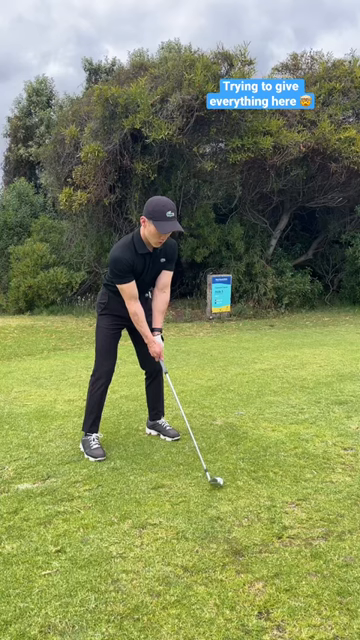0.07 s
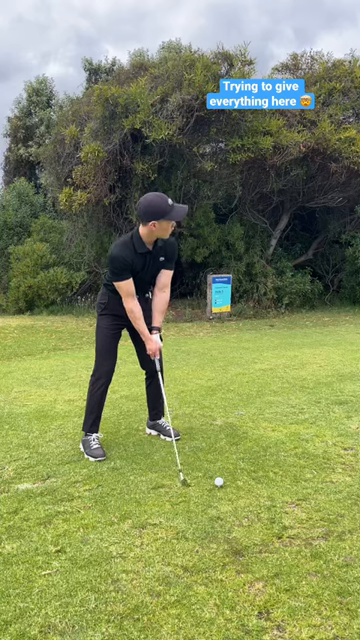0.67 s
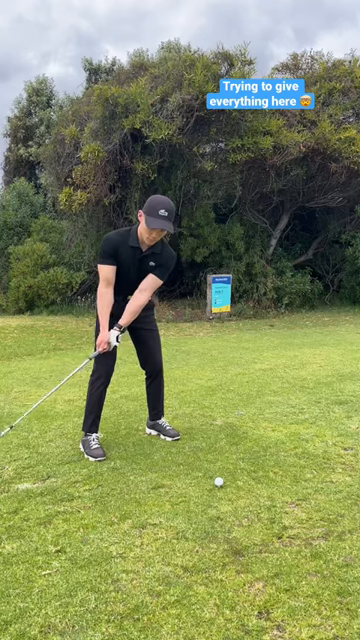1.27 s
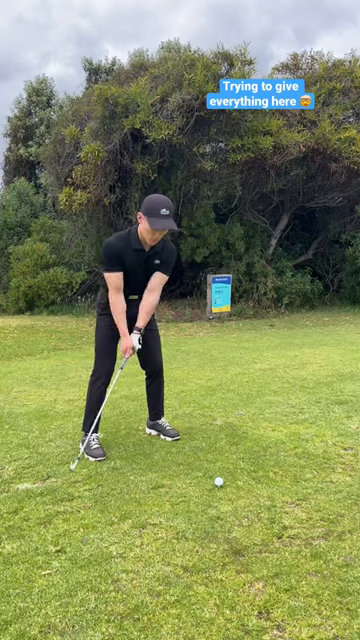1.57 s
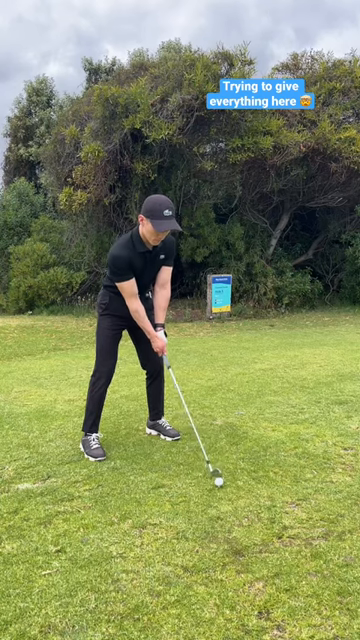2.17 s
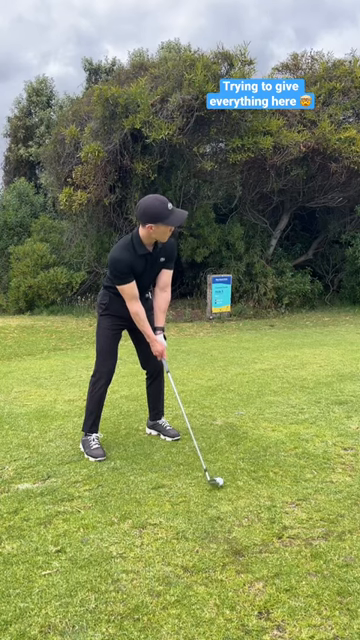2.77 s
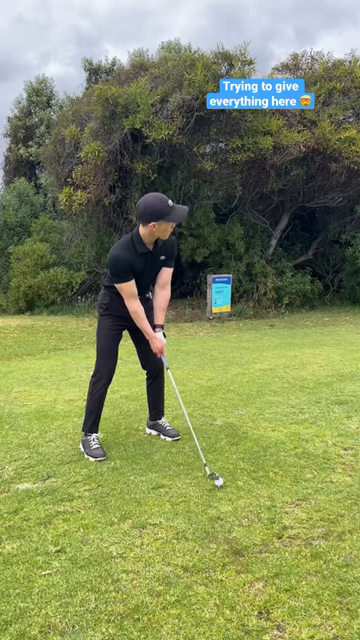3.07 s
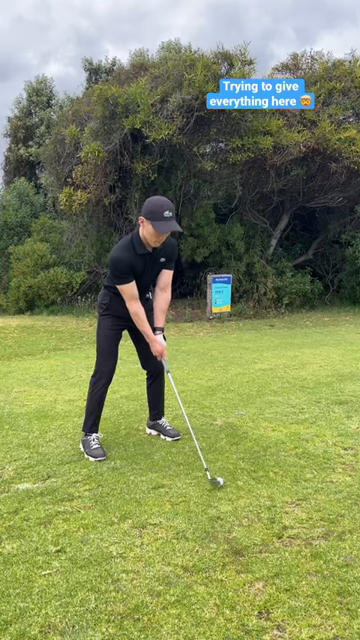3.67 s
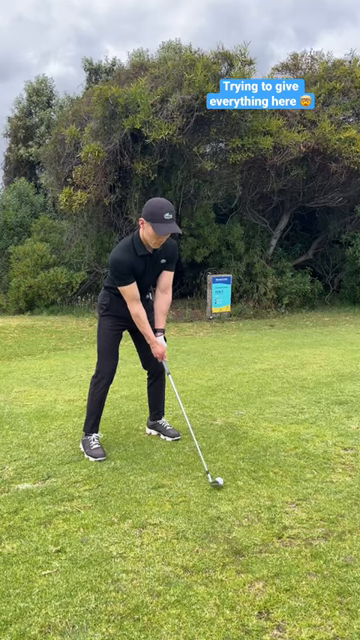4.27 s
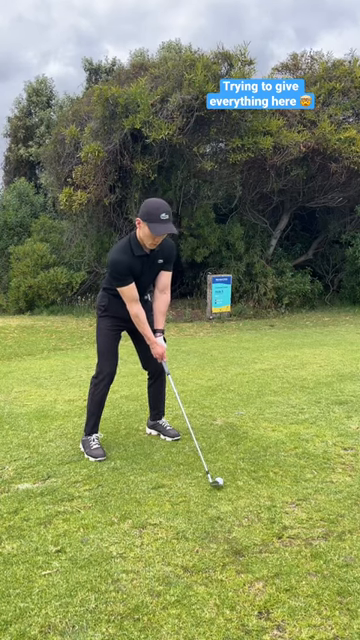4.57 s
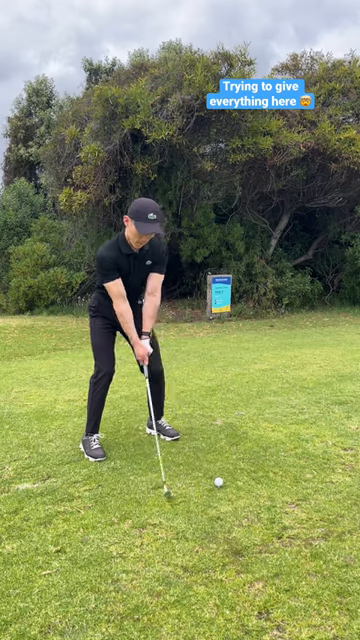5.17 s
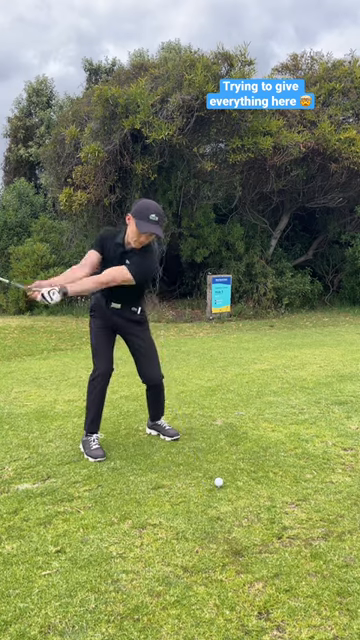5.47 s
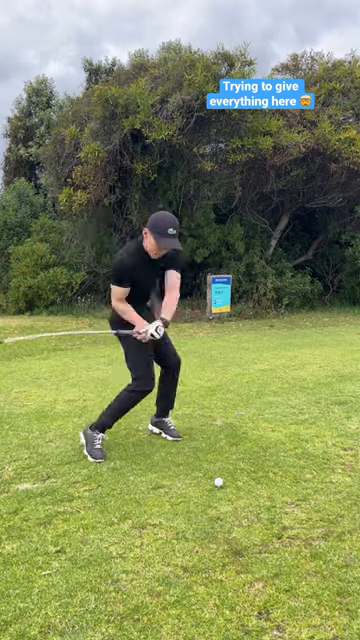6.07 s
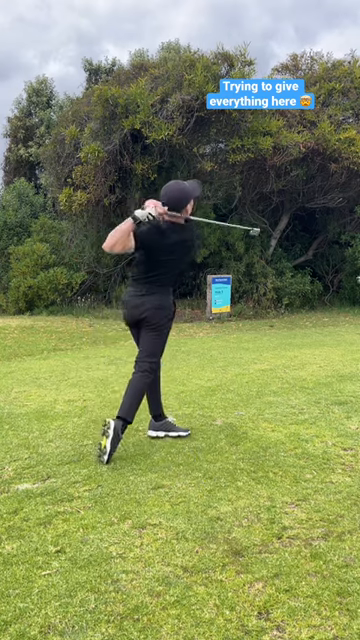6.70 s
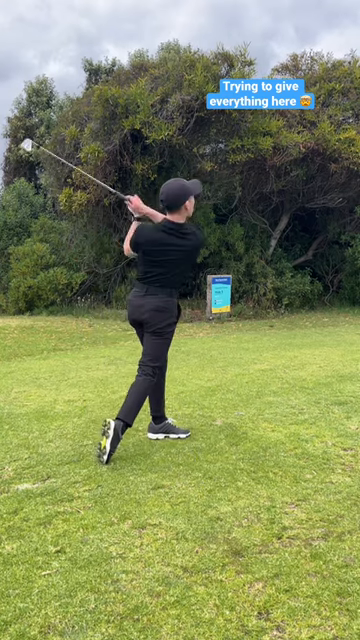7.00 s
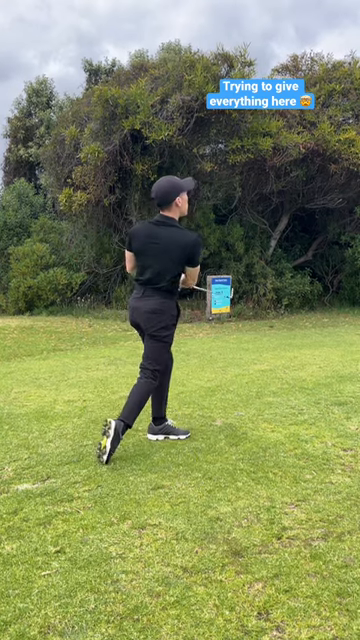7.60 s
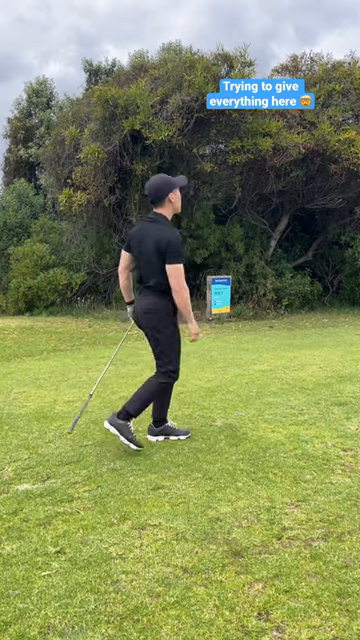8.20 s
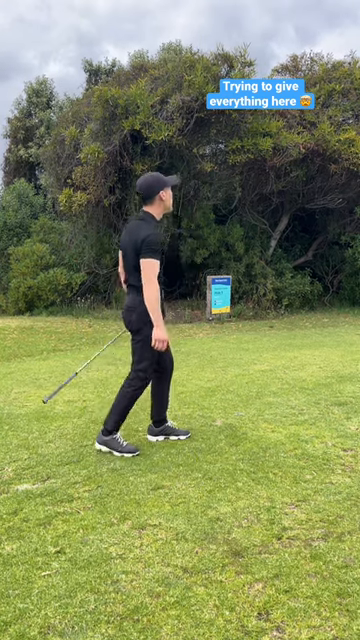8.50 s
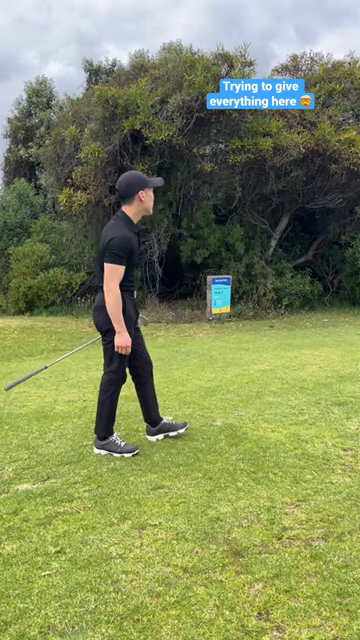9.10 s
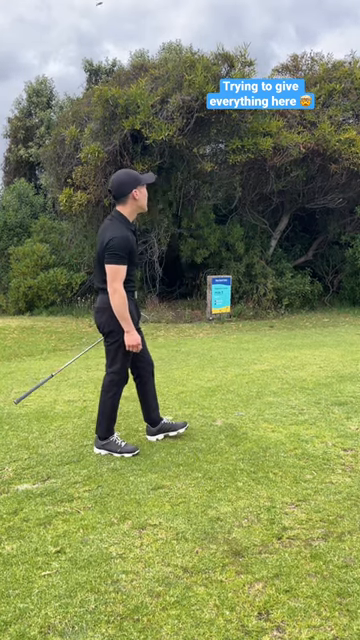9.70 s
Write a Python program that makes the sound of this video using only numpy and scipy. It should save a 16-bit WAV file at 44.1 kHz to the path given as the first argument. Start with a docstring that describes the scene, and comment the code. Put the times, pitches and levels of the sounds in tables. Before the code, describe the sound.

Wind buffets the microphone and small birds chirp as a golf club swishes and strikes a ball with a sharp crack.

```python
"""Gusts buffet the microphone over a distant rush; small birds call from the scrub and a far tone fades.
After 5 s a golfer lifts an iron with a swish of sleeves, then swings so fast that the shaft whistles.
At 6.1 s the club face cracks against the ball, both ring briefly, and turf thuds and sprays.
A songbird sings and a run of pips swells as the golfer steps off over the grass, around 8 s.
Near the end one bird scolds harshly while the wind blows on."""
import sys
import numpy as np
from scipy import signal
from scipy.fft import rfft, irfft, next_fast_len
from scipy.io import wavfile
from scipy.ndimage import map_coordinates

SR = 44100
rng = np.random.default_rng(int(sys.argv[2]) if len(sys.argv) > 2 else 0)


def generate_wav(signal):
    """Clip the signal to [-1, 1] and save it as 16-bit WAV at the path in sys.argv[1]."""
    frames = np.transpose(np.atleast_2d(signal))
    scaled = np.clip(frames, -1, 1) * 32767
    pcm = np.round(scaled).astype(np.int16)
    wavfile.write(sys.argv[1], SR, pcm)


N = 434385


def amp(db):
    """Turn decibels into a gain."""
    return 10 ** (np.asarray(db) / 20)


def unit(x):
    """Scale a sound to an average (rms) size of 1."""
    return x / np.sqrt(np.mean(x ** 2) + 1e-20)


def along(points, hz):
    """Read between (frequency, value) points on a log frequency scale."""
    freqs, values = np.transpose(points)
    return np.interp(np.log(hz + 1), np.log(freqs + 1), values)


def curve(rows):
    """Join (time, value) points with straight lines, one value per sample."""
    return np.interp(np.arange(N) / SR, *np.transpose(rows))


def wobble(rate):
    """A smooth random curve through `rate` points a second."""
    return map_coordinates(rng.standard_normal(int(N * rate / SR) + 4), [np.arange(N) * rate / SR])


def bell(s, length):
    """A smooth hump around time s, half as high at the ends of its length."""
    return .5 ** np.minimum((2 * (np.arange(N) / SR - s) / length) ** 2, 20)


def swells(rows):
    """Gain of events that rise until their time, hold, then fall; rise and fall each span 20 dB."""
    t, power = np.arange(N) / SR, 0
    for s, rise, hold, fall, db in rows:
        below = np.maximum(s - t, 0) / rise + np.maximum(t - s - hold, 0) / fall
        power += amp(db - 20 * np.minimum(below, 10)) ** 2
    return np.sqrt(power)


def filtered(x, response):
    """Multiply each frequency in x by response(frequency)."""
    n = x.shape[-1]
    padded = next_fast_len(n + 8192)
    return irfft(rfft(x, padded) * response(np.fft.rfftfreq(padded, 1 / SR)), padded)[..., :n]


def pan(db):
    """Left and right gains, with the left louder by db."""
    return amp([[db / 2], [-db / 2]])


def noise(colour, alike):
    """Stereo noise of a given colour; alike=1 makes both sides the same, 0 unrelated."""
    shared, apart = filtered(rng.standard_normal((2, N)), lambda hz: amp(along(colour, hz)))
    turn = np.arccos(np.clip(alike, -1, 1)) / 2
    shared, apart = np.cos(turn) * shared, np.sin(turn) * apart
    return unit(np.array([shared + apart, shared - apart]))


def add(track, s, sound):
    """Mix a sound into a stereo track at time s."""
    part = track[:, max(round(s * SR), 0):][:, :sound.shape[-1]]
    part += sound[..., :part.shape[-1]]


# how loud the far rush and the treble hiss are: (time [s], level [dB])
DISTANT_LEVEL = [(0.0, -60.5), (2.2, -57.5), (5.5, -56.5), (5.95, -54), (6.55, -59), (7.05, -52.5),
                 (7.42, -58.5), (8.5, -54.5), (9.3, -55.5), (9.85, -54)]
TREBLE_LEVEL = [(0.0, -68), (1.1, -69), (1.35, -66), (1.85, -66), (2.25, -71), (4.1, -70), (5.7, -67.5),
                (6.6, -62), (7.2, -79.5), (8.6, -69.5), (9.0, -77), (9.85, -87)]
# their colours, or how strong each frequency is: (frequency [Hz], level [dB])
DISTANT_COLOUR = [(30, -8), (200, -5.5), (450, -10), (750, 2.5), (1000, -1.5), (1400, -7.5), (2000, -15.5),
                  (2800, -30), (6000, -47.5), (12000, -74.5)]
TREBLE_COLOUR = [(1200, 12.5), (2400, 1), (3300, 4.5), (4600, 4.5), (5500, -7), (6800, -21.5),
                 (8000, -16.5), (12000, -31.5), (16000, -34.5)]
def air():
    """A distant steady rush, and a treble hiss that swells around the songbird's phrases."""
    far = amp(curve(DISTANT_LEVEL) + 1 + 1.2 * wobble(4.4)) * noise(DISTANT_COLOUR, alike=0.055)
    hiss = amp(curve(TREBLE_LEVEL) + 3 + 1.1 * wobble(29)) * noise(TREBLE_COLOUR, alike=0.48)
    return far + hiss * pan(0.66)


# swells of the far tone: (time [s], rise [s], hold [s], fall [s], level [dB])
FAR_TONE = [(.05, 0.027, 0.13, 0.18, -72.5), (.56, 0.06, 0.21, .2, -66.5), (1.3, 0.37, .15, 0.18, -72.5)]
def far_tone(hz=1160):
    """A soft tone far away on the right, wavering a little."""
    phase = 2 * np.pi * hz * np.arange(N) / SR + .5 * wobble(25)
    return swells(FAR_TONE) * unit(np.sin(phase) * amp(1.7 * wobble(20))) * pan(-15)


# strength of the breeze and of its finest swirls between gusts: (time [s], level [dB])
BREEZE = [(0.0, -43.5), (0.8, -46.5), (1.5, -44), (1.9, -43.5), (2.23, -48), (2.4, -43.5), (3.55, -47),
          (4.25, -41.5), (4.5, -52), (4.9, -42.5), (5.6, -42.5), (6.05, -40), (6.95, -39), (7.3, -41),
          (7.7, -37), (8.4, -40.5), (9.4, -42), (9.85, -40.5)]
FINE_LEVEL = [(0.0, -69.5), (2.2, -65.5), (2.55, -63.5), (3.2, -68), (4.7, -66), (4.95, -66), (5.12, -55),
              (5.35, -70), (5.8, -54), (6.3, -57), (6.6, -59), (7.05, -48), (7.3, -51.5), (7.55, -43.5),
              (7.8, -42.5), (8.0, -45), (8.3, -47.5), (8.55, -52), (8.75, -46.5), (9.1, -54), (9.85, -54.5)]
# gusts on top of the breeze: (time [s], length [s], rumble level [dB], swirls over rumble [dB])
GUSTS = [(0.205, 0.03, -28.5, -7.5), (0.26, 0.05, -34, -8.5), (0.34, .06, -39, -11.5),
         (0.614, 0.036, -37, -12.5), (1.022, 0.27, -45.5, -19), (1.424, 0.023, -34, -10.5),
         (1.605, 0.11, -39, -30), (1.743, 0.079, -39.5, -5), (2.48, 0.15, -52.5, 6.5),
         (2.8, 0.039, -38.5, -8.5), (3.765, 0.06, -28, -11), (3.835, .035, -30.5, -10.5),
         (4.036, 0.014, -40, 6), (4.09, .025, -32.5, -4.5), (4.15, 0.05, -32, -3.5),
         (4.308, 0.076, -37, -16.5), (5.17, 0.05, -37.5, 1), (5.46, .04, -42, 0), (5.78, 0.05, -40.5, 0.5),
         (6.063, .014, -40.5, 5.5), (6.35, 0.069, -34, -26), (6.53, .2, -47.5, -4), (6.85, 0.11, -34.5, -7),
         (7.042, 0.07, -44, 7.5), (7.583, 0.17, -33.5, 1.5), (7.747, 0.084, -32.5, 1.5),
         (7.888, 0.035, -42, 2), (8.078, 0.025, -32, -3.5), (8.245, 0.047, -33, -2.5),
         (8.433, 0.034, -38, 0.5), (8.804, 0.055, -47.5, 6), (8.97, 0.043, -37, -6),
         (9.704, 0.054, -39, 3.5)]
def wind_gains(usual_breeze_db=-41.5, fine_gust_db=-17.5):
    """Breeze and gusts add their power to a low rumble, swirls of air and finer swirls."""
    breeze_db = curve(BREEZE) + wobble(11)
    rumble_power = amp(breeze_db) ** 2
    swirl_power = amp(breeze_db - 4.5 + 0.9 * (breeze_db - usual_breeze_db)) ** 2
    fine_power = amp(curve(FINE_LEVEL)) ** 2
    for s, length, db, swirl_db in GUSTS:
        gust = amp(db) ** 2 * bell(s, length)
        rumble_power += gust
        swirl_power += amp(swirl_db) ** 2 * gust
        fine_power += amp(swirl_db + fine_gust_db) ** 2 * gust
    return np.sqrt([rumble_power, swirl_power, fine_power])


# the wind's three layers, low to high: (frequency [Hz], level [dB])
RUMBLE_COLOUR = [(20, -36.5), (35, -6.5), (58, 5), (100, 1), (160, -6.5), (260, -16.5), (500, -64),
                 (2000, -120)]
SWIRL_COLOUR = [(60, -30), (130, -1.5), (200, 1.5), (300, -1), (450, -13.5), (700, -24), (1300, -35.5),
                (3000, -56), (7000, -110)]
FINE_COLOUR = [(200, -16.5), (400, 8), (550, 4), (750, -4.5), (1100, -15), (2000, -26.5), (5000, -68.5),
               (9000, -110)]
def wind():
    """Wind buffets the microphone; stronger wind sheds smaller swirls, which sound higher."""
    rumble_gain, swirl_gain, fine_gain = wind_gains()
    lumps = wobble(30)
    rumble = rumble_gain * amp(1.6 * lumps - 0.27) * noise(RUMBLE_COLOUR, alike=0.9) * pan(1.5)
    swirls = swirl_gain * amp(1.9 * lumps - 3) * noise(SWIRL_COLOUR, alike=0.45) * pan(1)
    fine = fine_gain * amp(1.6 * lumps) * noise(FINE_COLOUR, alike=0.1) * pan(0.93)
    return rumble + swirls + fine


# single thumps of air: (time [s], level [dB], rough pitch [Hz])
THUMPS = [(0.185, -26.5, 110), (0.265, -23, 156), (5.108, -24.5, 95), (6.0384, -21, 162), (6.124, -28, 172)]
def wind_thumps():
    """Each thump is one push and one pull of air on the microphone."""
    out = np.zeros((2, N))
    for s, db, hz in THUMPS:
        u = np.linspace(-np.pi, np.pi, round(2 * SR / hz))
        push_pull = -2 * u * np.exp(-u * u)
        add(out, s - 1 / (2 * hz), push_pull * amp(db) * pan(2.5))
    return out


# how long the bushes echo: (frequency [Hz], time to fade by 60 dB [s])
SCRUB_FADE = [(200, .25), (2000, 0.41), (4500, 0.15), (7000, 0.18), (14000, 0.088)]
def scrub_echo(x):
    """Bushes scatter a sound into a thin, blurred tail."""
    hz, t, spectrum = signal.stft(rng.standard_normal((2, SR // 2)), SR, nperseg=256)
    fade = amp(-60 * t / along(SCRUB_FADE, hz)[:, None])
    tail = signal.istft(spectrum * fade, SR, nperseg=256)[1]
    return signal.fftconvolve(x, tail / np.linalg.norm(tail[0]), axes=1)[:, :N]


def among_leaves(sound, echo_db, fade_s=0.2):
    """A note plus quickly dying echoes from the leaves right around the bird."""
    t = np.arange(SR // 6) / SR
    echoes = rng.standard_normal((2, len(t))) * amp(-60 * t / fade_s) * (1 - np.exp(-t / 0.0031))
    response = (t == 0) + amp(echo_db) * echoes / np.linalg.norm(echoes[0])
    return signal.fftconvolve(sound, response, axes=1)


def glide(length, start, middle, end, waver):
    """Pitch and loudness of one bird note: a slightly unsteady arc that swells and fades."""
    progress = np.linspace(0, 1, max(round(length * SR), 16))
    hz = np.polyval(np.polyfit([0, .5, 1], [start, middle, end], 2), progress)
    points = rng.standard_normal(256)
    shake = map_coordinates(points, [progress * length * 160], mode="mirror")
    drift_db = map_coordinates(points[::-1], [progress * length * 40], mode="mirror")
    return hz * (1 + waver * shake), np.abs(np.sin(np.pi * progress)) ** 0.62 * amp(drift_db)


def flutter(samples, rate):
    """A random tremble for one note, through `rate` points a second."""
    return map_coordinates(rng.standard_normal(256), [np.arange(samples) * rate / SR], mode="mirror")


def whistle(length, start, middle, end, waver, ragged=1):
    """A bird's single gliding tone; `ragged` sets how much it flutters."""
    hz, swell = glide(length, start, middle, end, waver)
    flutter_db = 1.5 * ragged * flutter(len(hz), 450)
    phase = 2 * np.pi * np.cumsum(hz) / SR + .2 * ragged * flutter(len(hz), 450)
    return np.sqrt(2) * swell * amp(flutter_db) * np.sin(phase)


# what a bird's throat lets through: (frequency over the throat's own [ratio], level [dB])
THROAT = [(.3, -33), (.5, -12.5), (.7, -6.5), (1, -1.5), (1.2, -18), (1.45, -24), (1.8, -20.5),
          (2.3, -50.5)]
def reed(length, start, middle, end, throat_hz, rough=.065, waver=0.0046):
    """A rasping note whose overtones pass through the throat and die out far above it."""
    hz, swell = glide(length, start, middle, end, waver)
    harmonic = np.arange(1, 6)[:, None]
    ratio = harmonic * hz / throat_hz
    gain = amp(np.interp(ratio, *np.transpose(THROAT))) / (1 + (ratio / 1.5) ** 14)
    rasp = amp(3.5 + 2 * flutter(len(hz), 700))
    phase = 2 * np.pi * np.cumsum(hz) / SR + rough * flutter(len(hz), 700)
    return swell * rasp * (gain * np.sin(harmonic * phase)).sum(0)


# bouts of twitter deep in the scrub: (time [s], length [s], level [dB])
TWITTER = [(6.42, 0.35, -72), (8.326, .36, -71)]
def twitter(count=8, usual_hz=3900, spread_octaves=0.34, note_s=0.037):
    """Short sliding whistles at random pitches."""
    for s, length, db in TWITTER:
        for k, (pitch, slide, side) in enumerate(rng.standard_normal((count, 3))):
            hz = usual_hz * 2 ** (spread_octaves * np.clip(pitch, -1.5, 1.5))
            step = 2 ** (0.14 * slide)
            note = whistle(note_s, hz / step, hz, hz * step, waver=0.018)
            yield s + length * k / count, db, pan(3 * side) * note


# thin arched notes: (time [s], length [s], top pitch [Hz], depth [share of the top], level [dB])
ARCHES = [(0.862, 0.065, 6790, 0.19, -63), (0.966, 0.095, 6600, 0.45, -67), (1.087, 0.037, 8330, .17, -67),
          (1.092, 0.044, 7600, 0.34, -65.5), (2.136, 0.042, 7140, 0.12, -72),
          (3.057, 0.057, 7700, 0.36, -69), (3.902, 0.041, 7060, 0.1, -73),
          (4.219, 0.026, 4560, 0.054, -66.5), (4.655, 0.083, 4640, .06, -69),
          (5.53, 0.061, 7100, 0.046, -75.5), (6.853, 0.027, 3710, .27, -49)]
# sliding notes: (time [s], length [s], start [Hz], end [Hz], level [dB], left over right [dB])
SLIDES = [(0.398, 0.074, 6740, 7720, -67, 1), (0.828, 0.037, 4670, 6100, -66, 9),
          (2.842, 0.014, 4300, 3900, -51.5, -4), (3.668, .22, 2200, 2250, -74.5, -12),
          (3.89, 0.055, 2300, 2680, -74.5, -11), (4.562, 0.07, 4990, 4460, -72, 0),
          (6.348, 0.032, 5480, 4980, -62.5, -13), (6.387, 0.13, 4830, 4770, -61, -12),
          (6.419, 0.06, 3280, 4100, -69, -5), (6.5, .018, 4900, 4200, -61, 3),
          (6.504, .016, 3900, 3020, -66, -2), (6.521, 0.015, 3070, 3600, -67, -2),
          (6.543, 0.022, 4400, 4120, -50, -2), (6.563, 0.019, 2940, 2650, -59.5, 1),
          (6.582, 0.011, 4380, 3450, -52, -2), (6.605, 0.012, 4800, 4100, -52, 1),
          (6.874, 0.021, 3850, 5100, -48.5, 3), (8.102, 0.11, 3200, 5300, -73, -21.5),
          (8.174, 0.17, 4900, 4840, -78, 12), (8.394, 0.087, 3450, 3030, -66.5, 4),
          (8.44, 0.11, 6030, 5350, -83, 10), (8.522, .06, 4750, 4480, -70, 0),
          (9.821, 0.018, 6600, 4800, -64, 0)]
def calls(fall_back=0.56):
    """Whistles that arch up and partway back down, or slide from one pitch to another."""
    for s, length, top, depth, db in ARCHES:
        start, end = top * (1 - depth), top * (1 - fall_back * depth)
        yield s, db, pan(-1) * whistle(length, start, top, end, waver=0.025)
    for s, length, start, end, db, side_db in SLIDES:
        yield s, db, pan(side_db) * whistle(length, start, np.sqrt(start * end), end, waver=.015)


# rising chirps: (time [s], length [s], middle pitch [Hz], throat [Hz], level [dB])
CHIRPS = [(0.258, 0.07, 1745, 4970, -66), (1.417, 0.037, 1740, 4000, -67), (1.933, 0.045, 1810, 5150, -66),
          (2.461, 0.044, 2230, 5220, -54), (2.789, 0.056, 2350, 5030, -46.5),
          (3.606, 0.04, 2900, 3600, -67), (4.171, 0.054, 1750, 5540, -70),
          (4.668, 0.061, 1650, 5170, -66.5), (7.576, 0.037, 1730, 4800, -64.5),
          (8.663, .046, 2220, 6540, -80), (5.233, 0.038, 2750, 7000, -77.5), (9.21, 0.048, 2820, 6400, -77),
          (9.735, 0.067, 1620, 4820, -67.5)]
def chirps(growth_db=17):
    """Rasping upward sweeps that get louder as they climb."""
    for s, length, hz, throat_hz, db in CHIRPS:
        chirp = reed(length, .73 * hz, hz, 1.36 * hz, throat_hz, rough=.13, waver=0.0059)
        yield s, db, pan(-.6) * chirp * amp(growth_db * np.linspace(-.5, .5, len(chirp)))


# pips, mostly in one run that swells and fades: (time [s], length [s], start [Hz], end [Hz], level [dB])
PIPS = [(0.37, 0.033, 4500, 3150, -48.5), (5.58, 0.028, 4250, 3450, -65), (5.682, .026, 4550, 3420, -66),
        (7.3, 0.039, 4300, 3100, -71.5), (7.404, .032, 4400, 3100, -70.5),
        (7.514, 0.037, 4500, 3090, -69.5), (7.62, 0.032, 4600, 3120, -66), (7.702, 0.038, 4600, 3080, -57),
        (7.786, 0.03, 4700, 3060, -52), (7.868, 0.028, 4650, 3050, -54), (7.968, 0.027, 4600, 3070, -49),
        (8.053, 0.027, 4550, 3070, -50), (8.151, 0.029, 4500, 3070, -51.5), (8.249, .033, 4350, 3070, -55),
        (8.337, 0.029, 4300, 3020, -59), (8.43, .032, 4300, 3030, -65.5), (8.811, 0.029, 4100, 3170, -61),
        (8.852, .034, 4100, 3120, -66), (9.082, 0.044, 4050, 2720, -67.5), (9.264, .05, 3950, 2900, -70)]
def pips(sag=.98):
    """Falling pips from a bird on the left: the right side hears them later and softer."""
    for s, length, start, end, db in PIPS:
        pip = whistle(length, start, sag * np.sqrt(start * end), end, waver=0.01)
        yield s, db, pan(3.4) * np.array([pip, np.roll(pip, 3)])


# the songbird's phrase: (time [s], length of the long whistle [s], level [dB])
PHRASES = [(6.637, 0.14, -50.5), (8.507, 0.16, -52.5)]
# its other rasping notes:
# (time [s], length [s], start [Hz], middle [Hz], end [Hz], throat [Hz], roughness [rad], level [dB])
FLOURISHES = [(6.464, 0.065, 1337, 1317, 1290, 4000, 0.14, -56),
              (6.589, 0.018, 1510, 1670, 1820, 3520, .25, -55),
              (6.614, 0.022, 1640, 1590, 1710, 3400, .25, -55),
              (6.835, 0.018, 1380, 1297, 1260, 3970, .1, -54),
              (6.85, 0.014, 1505, 1526, 1570, 4430, .5, -50),
              (6.868, 0.025, 1595, 1253, 1600, 4430, 0.25, -49.5),
              (6.89, 0.071, 1710, 1716, 1480, 3680, 0.035, -45),
              (6.95, 0.013, 1520, 1530, 1510, 4300, 0.33, -47.5),
              (6.961, 0.0454, 1596, 1553, 1460, 4220, .05, -45.5),
              (6.99, .056, 1417, 1516, 1250, 4495, 0.036, -47),
              (9.802, 0.035, 2100, 3130, 2740, 3900, .05, -50.5),
              (9.833, 0.039, 1570, 1437, 1400, 4480, .08, -50)]
def song(dip_s=0.093, dip_hz=1454, flick_s=0.01, flick_hz=4080, long_hz=4160):
    """A songbird sings a rasping dip, a quick flick and a long whistle, and adds flourishes."""
    side, dip_edge, long_edge = pan(-1.2), 1.33 * dip_hz, 0.89 * long_hz
    for s, length, db in PHRASES:
        dip = reed(dip_s, dip_edge, dip_hz, dip_edge, throat_hz=3080)
        flick = whistle(flick_s, long_edge, flick_hz, long_hz, waver=.006)
        held = whistle(length, long_edge, long_hz, long_edge, waver=0.003, ragged=.2)
        yield s, db - 4.5, side * dip
        yield s + dip_s - flick_s / 2, db - 4.5, side * flick
        yield s + dip_s + flick_s, db, side * held
    for s, *note, db in FLOURISHES:
        yield s, db, side * reed(*note)


def birds(hidden_below_db=-63.5):
    """Mix the (time, level, sound) notes; fainter birds sit deeper in the scrub and are scattered more."""
    near, hidden = np.zeros((2, N)), np.zeros((2, N))
    # each kind of note with the level of its leaf echoes [dB]
    kinds = [(calls(), -14), (pips(), -19.5), (chirps(), -4), (song(), -17.5), (twitter(), -14)]
    for notes, echo_db in kinds:
        for s, db, sound in notes:
            depth = np.arctan(amp(hidden_below_db - db))
            add(near, s, amp(db) * np.cos(depth) * among_leaves(sound, echo_db))
            add(hidden, s, amp(db) * np.sin(depth) * sound)
    hidden *= amp(1 + 5 * np.array([wobble(160), wobble(160)]))  # each side flickers on its own
    return near + amp(-14) * hidden + scrub_echo(amp(-23) * near + amp(-6) * hidden)


# a scolding call: (time [s], rise [s], hold [s], fall [s], level [dB])
SCOLD = [(9.56, .12, 0.086, 0.094, -78.5)]
# its colour: (frequency [Hz], level [dB])
SCOLD_COLOUR = [(1500, -60), (2500, -34), (4400, 2.5), (5300, -3), (6500, -9), (7300, -14), (9000, -60)]
def scold():
    """One bird gives a harsh, toneless call."""
    return swells(SCOLD) * amp(2 * wobble(120)) * noise(SCOLD_COLOUR, alike=0.27)


# the golfer's moves, and sleeves as the club goes up: (time [s], rise [s], hold [s], fall [s], level [dB])
MOVES = [(5.8, 1.6, .01, .1, -99), (5.88, 0.082, 0.53, 0.79, -83.5), (6.98, .08, 0.0091, 0.26, -95),
         (7.88, 0.35, 0.31, 0.058, -86), (8.33, 0.15, 0.39, 0.18, -93)]
BACKSWING = [(5.495, .09, .045, .14, -66)]
# colours of a bright rustle with two narrow treble gaps, and of sleeves: (frequency [Hz], level [dB])
RUSTLE_COLOUR = [(1000, -6.5), (4000, 2.5), (6000, -15), (7200, 6.5), (9200, 2), (10300, -26.5),
                 (11500, 6.5), (13500, 1.5), (14600, -15), (16000, -21.5)]
SLEEVE_COLOUR = [(100, -20), (500, -5), (1400, 2), (2500, 0), (4400, 0), (6000, -20), (10000, -60)]
def rustle():
    """Shoes and clothes rustle through the swing, the recovery and two steps over the grass."""
    crackle = amp(10.5 + 4 * wobble(400) + 1.8 * wobble(25))
    moves = swells(MOVES) * crackle * noise(RUSTLE_COLOUR, alike=.1)
    return moves + swells(BACKSWING) * noise(SLEEVE_COLOUR, alike=.5)


# small ticks: (time [s], level [dB], pitch [Hz])
TICKS = [(5.991, -45, 1600), (6.1098, -31, 4350), (6.214, -37, 1580), (4.347, -67, 7840),
         (8.043, -42, 1550), (8.703, -67, 11040)]
def ticks(fade_s=0.02, rise_s=0.00027):
    """Grass, soil, shoes and grip tick, each with a rough tone that dies at once."""
    out, t = np.zeros((2, N)), np.arange(SR // 20) / SR
    for s, db, hz in TICKS:
        tone = np.sin(2 * np.pi * hz * t + np.cumsum(rng.normal(0, .1, len(t))))
        add(out, s, amp(db - 60 * t / fade_s) * (1 - np.exp(-t / rise_s)) * tone)
    return out


# a soft thud of shifting weight, then two thuds: (time [s], rise [s], hold [s], fall [s], level [dB])
THUDS = [(5.145, 0.017, 0.02, 0.025, -44), (6.105, 0.043, 0.028, 0.018, -35),
         (6.155, .012, 0.03, 0.029, -45)]
# their colour: (frequency [Hz], level [dB])
THUD_COLOUR = [(100, -20.5), (220, -2), (420, 3), (650, -6), (1000, -11), (2500, -42.5), (6000, -110)]
def thuds():
    """A short dull thud as the golfer shifts weight on the turf, then thuds as the club digs in and lifts the
    turf."""
    return swells(THUDS) * noise(THUD_COLOUR, alike=0.26)


# which side hears the golfer first: (frequency [Hz], lead of the left side [rad])
LEFT_LEAD = [(100, -3.4), (450, 2.1), (690, -0.35), (1210, -2.5), (2670, 3), (3790, 1.5), (5000, 1.3),
             (7670, 6), (8870, 5.5), (11800, 8), (13200, 14.5), (16200, 17.5)]
def from_golfer(x):
    """Sound from the tee reaches the microphone's two openings out of step."""
    return filtered(x, lambda hz: np.exp(.5j * along(LEFT_LEAD, hz) * np.array([[1], [-1]])))


# bursts of flying turf: (time [s], rise [s], hold [s], fall [s], level [dB])
SPRAY = [(6.115, .002, .001, 0.025, -51), (6.151, .008, 0.02, 0.055, -42), (6.2, .02, .01, 0.36, -61),
         (6.322, 0.05, .012, 0.07, -63)]
# their colour: (frequency [Hz], level [dB])
TURF_COLOUR = [(400, 0), (1500, 6), (3500, 3), (6000, 0), (8000, 3.5), (10000, -11), (12500, 1.5),
               (16000, -15)]
def turf_spray():
    """Torn grass and soil spray up in uneven clumps."""
    clumps = amp(2.2 * wobble(600) + .8 * wobble(60))
    return from_golfer(swells(SPRAY) * clumps * noise(TURF_COLOUR, alike=0.93))


# the shaft's speed, heard as the pitch of its whistle: (time [s], pitch [Hz])
SHAFT_PITCH = [(5.98, 254.3), (6.05, 377.5), (6.07, 493.3), (6.093, 697), (6.109, 825), (6.125, 463.7),
               (6.19, 349), (6.27, 245.6)]
def shaft_whistle(db_per_octave=13):
    """The shaft sheds swirls of air that whistle higher and louder the faster it moves."""
    t, hz = np.arange(N) / SR, curve(SHAFT_PITCH)
    swinging = (t > SHAFT_PITCH[0][0]) & (t < SHAFT_PITCH[-1][0])
    phase = 2 * np.pi * np.cumsum(hz) / SR + 0.41 * wobble(220)
    # both sides hear the same whistle, each through its own churning air
    tone = unit(np.array([np.sin(phase + wobble(300)) * amp(2.1 * wobble(180)) for side in range(2)]))
    speed_db = -28 + db_per_octave * np.log2(hz / hz.max())
    flare_db = 13.5 * bell(6.0925, length=0.0027)  # just before the ball is hit
    return swinging * amp(speed_db + flare_db) * tone


# the club head's swish and hiss: (time [s], rise [s], hold [s], fall [s], level [dB])
HEAD_SWISH = [(6.073, .032, .036, .014, -32)]
HEAD_HISS = [(6.1, .055, .009, .004, -49)]
# their colours: (frequency [Hz], level [dB])
SWISH_COLOUR = [(200, -18.5), (400, 2), (600, 3.5), (1100, 8.5), (1900, -2), (2800, -1), (4800, -11),
                (6500, -23.5), (8500, -23.5), (13000, -31.5), (16000, -34.5)]
HISS_COLOUR = [(2500, -24), (4400, -0.5), (6000, -7.5), (8000, 1.5), (10200, -12), (12200, -4),
               (15000, -14)]
def swing():
    """The shaft whistles; the head tears the air and hisses as it skims the grass near top speed."""
    shaft = shaft_whistle()
    swish = swells(HEAD_SWISH) * noise(SWISH_COLOUR, alike=0.94)
    hiss = swells(HEAD_HISS) * noise(HISS_COLOUR, alike=1)
    return from_golfer(shaft + swish + hiss) * pan(-1.7)


# the club meets grass, ball, then turf: (time [s], level [dB], time to fade by 60 dB [s])
BLOWS = [(6.112, -18, .008), (6.1135, -3.5, .0058), (6.1178, -16.5, .009)]
# colour of each blow: (frequency [Hz], level [dB])
CRACK_COLOUR = [(200, -24), (700, -2.5), (2000, 3.5), (3100, -5), (4200, -10.5), (6500, -5), (8500, -5.5),
                (10500, -3), (14500, -3.5), (16000, -17)]
# ringing tones of head and ball: (frequency [Hz], level [dB], time to fade by 60 dB [s])
RING_TONES = [(667, -18.5, .02), (950, -5.5, 0.018), (1400, 4.5, 0.0043), (1977, 0, 0.0091),
              (2590, -10, 0.007), (3392, -14, 0.036), (3826, -18, .035), (4221, -19.5, .03),
              (5350, -9.5, 0.022), (6760, -19.5, 0.028), (7800, -16.5, 0.013), (10900, -16, .008)]
def strike(click_s=.00004, click_delay_s=0.00055):
    """A contact under a millisecond long cracks and rings head and ball; the club then bites the turf."""
    crack, ring, t = np.zeros((2, N)), np.zeros((2, N)), np.arange(SR // 10) / SR
    for s, db, fade_s in BLOWS:
        grit = unit(filtered(rng.standard_normal((2, len(t))), lambda hz: amp(along(CRACK_COLOUR, hz))))
        add(crack, s, amp(db - 8 - 60 * t / fade_s) * grit)
    hit_s, hit_db, _ = BLOWS[1]
    hit_gain = amp(hit_db - 5.5)
    click = (1 - t / click_s) * np.exp(-t / click_s)  # the ball snaps off the face
    add(crack, hit_s + click_delay_s, hit_gain * click * pan(2))
    # neighbouring tones start in opposite directions, so the ring builds up over its first cycles
    tones = sum((-1) ** k * amp(db - 60 * t / fade_s) * np.sin(2 * np.pi * hz * t)
                for k, (hz, db, fade_s) in enumerate(RING_TONES))
    add(ring, hit_s, hit_gain * tones * pan(-1.6))
    # ring and crack reach the two sides a fraction of a millisecond apart
    return np.array([crack[0] + np.roll(ring[0], 5), np.roll(crack[1], 10) + ring[1]])


def scene():
    """Golfer in the open, birds inside the scrub, wind over everything."""
    club = swing() + strike()
    club_echo = amp(-22.5) * scrub_echo(club)
    birdlife = birds() + scold()
    tee = ticks() + turf_spray() + rustle() + thuds()
    background = air() + far_tone() + wind() + wind_thumps()
    return background + birdlife + tee + club + club_echo


def record(dry, silence_s=0.031, top_hz=15600):
    """The sound fades in after a brief silence, and the highest treble is cut."""
    fade_in = np.clip((np.arange(N) / SR - silence_s) / .005, .01, 1)
    return filtered(dry * fade_in, lambda hz: 1 / np.sqrt(1 + (hz / top_hz) ** 120))


dry = scene()
out = record(dry)
generate_wav(out)
```